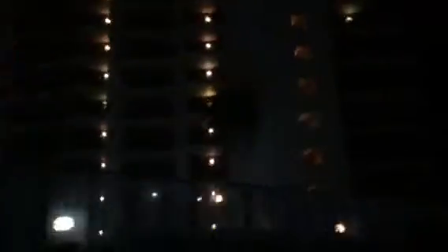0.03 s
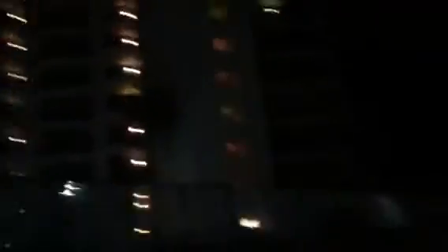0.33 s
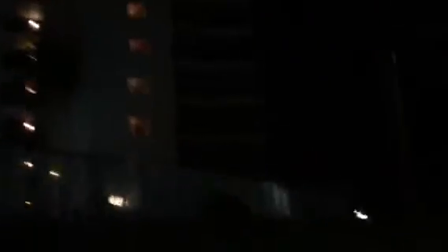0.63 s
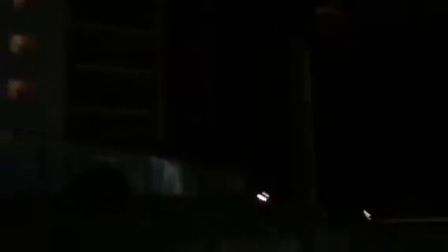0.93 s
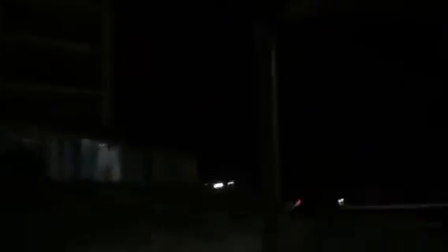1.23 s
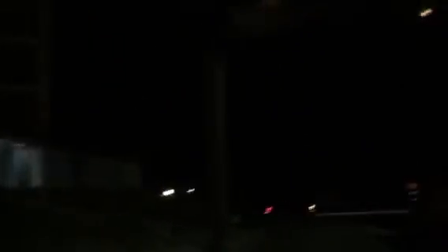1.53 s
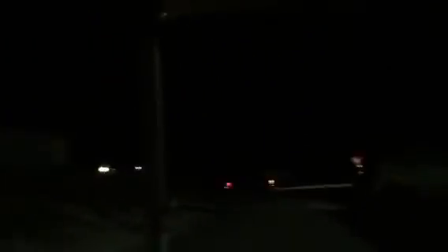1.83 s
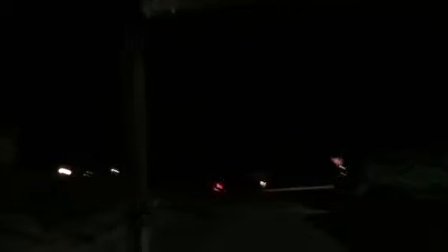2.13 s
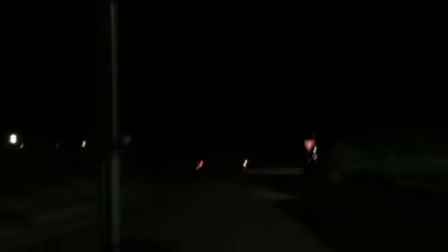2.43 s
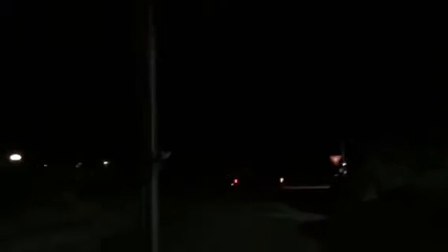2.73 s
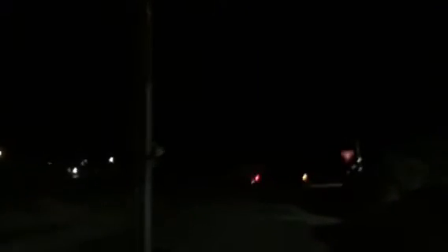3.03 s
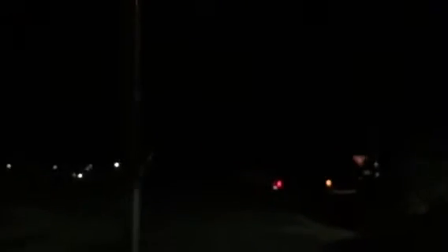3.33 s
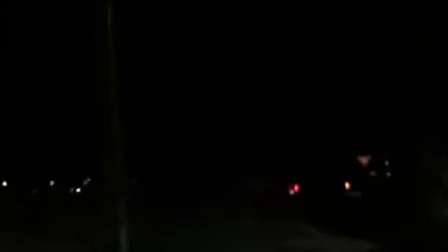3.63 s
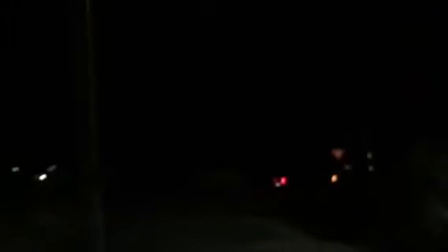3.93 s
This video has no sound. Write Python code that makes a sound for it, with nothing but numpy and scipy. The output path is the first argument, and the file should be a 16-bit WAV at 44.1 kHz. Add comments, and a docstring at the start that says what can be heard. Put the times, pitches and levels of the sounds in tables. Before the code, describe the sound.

Wind buffets a bare handheld microphone beside a road at night, making an uneven low rumble with thumps, flutters and small crackles. The gusts peak near the middle, while faint distant traffic murmurs behind and gradually recedes.

```python
"""A low, gusty rumble comes first: wind on a bare handheld microphone beside a road at night.
Turbulent air makes the pressure fluctuate, and the smaller the eddy, the higher its sound: big eddies
thump the diaphragm, while small ones flutter, rasp and crackle at the port and overload the input.
Distant traffic murmurs behind the wind, with a soft swell of tyre hiss."""
import sys
import numpy as np
from scipy import signal
from scipy.fft import rfft, irfft
from scipy.io import wavfile
from scipy.ndimage import uniform_filter1d, minimum_filter1d

SR = 44100
rng = np.random.default_rng(int(sys.argv[2]) if len(sys.argv) > 2 else 0)


def waveform_to_disk(signal):
    """Save audio, clipped to [-1, 1], as 16-bit WAV at the path in sys.argv[1]."""
    frames = np.transpose(np.atleast_2d(signal))
    scaled = np.clip(frames, -1, 1) * 32767
    samples = np.round(scaled).astype(np.int16)
    wavfile.write(sys.argv[1], SR, samples)


N = 176400
T = np.arange(N) / SR

# Strength of the airflow, as the relative level of its rumble: time_s, level_db
AIRFLOW = [(0,-25.5),(.05,-44),(.08,-19),(.27,-27),(.42,-18.5),(.52,-27.5),(.59,-27),(.66,-21.5),(.81,-18),(.86,-36.5),(.93,-15.5),(.99,-33.5),(1.13,-33.5),(1.18,-24),(1.27,-18),(1.31,-34),(1.36,-16.5),(1.43,-28),(1.51,-5.5),(1.63,-26.5),(1.68,-17),(1.89,-27.5),(2.07,-13.5),(2.2,-18.5),(2.31,-29.5),(2.37,-19.5),(2.58,-17.5),(2.63,-30),(2.7,-18),(2.87,-25.5),(2.96,-20.5),(3.08,-24),(3.16,-13.5),(3.22,-15),(3.26,-36),(3.32,-45),(3.39,-18.5),(3.52,-21),(3.66,-19.5),(4,-21)]
# Spectra of the wind rumble and of the weak eddies: frequency_hz, relative_density_db
RUMBLE_SPECTRUM = [(18,-33.5),(30,-29.5),(48,-5.5),(70,0),(120,-5),(220,-13.5),(330,-18),(600,-43),(1500,-77),(5000,-93)]
EDDY_SPECTRUM = [(100,-25),(230,2),(450,4.5),(900,-1.5),(1500,-7),(2500,-19.5),(4000,-34.5),(8000,-48)]
# Spectra of the traffic murmur and of the tyre hiss: frequency_hz, relative_density_db
TRAFFIC_SPECTRUM = [(25,-20.5),(65,20.5),(130,2),(300,-3),(600,-7.5),(950,-3),(1400,-6.5),(1950,-9.5),(2400,-26),(3500,-36.5),(5000,-46.5),(12000,-63.5)]
TYRE_SPECTRUM = [(1000,-22),(2500,16),(4000,6.5),(4900,-1),(6500,3),(7500,-3.5),(9400,-2),(10500,-15.5),(12000,-9.5),(15000,-16)]
# Narrow bands that sing in the traffic: pitch_hz, width_hz, relative_level_db
TRAFFIC_DRONES = [(668,18,-45),(955,14,-42.5),(1854,90,-44.5)]
# The murmur swells slightly, then recedes: time_s, gain_db
TRAFFIC_GAIN = [(0,-2),(1.2,-0.5),(2.4,-2.5),(4,-11.5)]
# Swell of the far tyre hiss: time_s, level_db
TYRE_SWELL = [(0,-59.5),(.5,-57.5),(1.0,-54.5),(1.4,-53.5),(2.0,-58),(2.6,-58),(3.3,-59),(4,-64)]
# Small eddies that break at the port: time_s, base_length_s, flutter_db, rasp_db, crackle_db
PORT_BUFFETS = [(0.073, 0.0018, -16.5, -41, -50), (0.087, 0.011, -14.5, -22.5, -40),
                (0.104, 0.0052, -18, -30, -56), (0.142, 0.0095, -21.5, -28.5, -49),
                (0.181, 0.01, -18, -24.5, -40.5), (0.211, 0.0037, -15, -21.5, -48),
                (0.217, 0.0037, -9, -12, -17), (0.255, 0.0087, -19, -38, -50),
                (0.307, 0.016, -21, -25.5, -39.5), (0.359, 0.0089, -17.5, -41, -57),
                (0.379, 0.0089, -17.5, -37, -52), (0.404, 0.0052, -21, -28, -40.5),
                (0.44, 0.014, -26, -27, -40), (0.444, 0.0052, -11, -14, -20.5),
                (0.505, 0.0063, -12.5, -18.5, -33), (0.518, 0.014, -19, -32, -51),
                (0.548, 0.0034, -16.5, -31, -40), (0.597, 0.0063, -21, -38, -59),
                (0.636, 0.012, -27, -29, -50), (0.65, 0.0055, -20, -22.5, -39),
                (0.664, 0.012, -21.5, -33, -54), (0.698, 0.002, -13, -34, -47),
                (0.715, 0.013, -16.5, -28, -43.5), (0.737, 0.014, -23.5, -31, -51),
                (0.809, 0.0034, -18.5, -49, -64), (0.857, 0.0034, -17, -25.5, -56),
                (0.921, 0.0049, -20, -36, -60), (0.95, 0.0056, -19, -31.5, -58),
                (1.168, 0.006, -24.5, -30.5, -60), (1.209, 0.0078, -16, -33, -57),
                (1.236, 0.0063, -13.5, -22, -43), (1.241, 0.0047, -7.5, -18.5, -35),
                (1.262, 0.0067, -13, -33, -54), (1.358, 0.0042, -11.5, -15, -33),
                (1.367, 0.0071, -14.5, -34, -49), (1.377, 0.0019, -4, -12.5, -22.5),
                (1.461, 0.0029, -35, -31, -61), (1.479, 0.0045, -12, -37, -58),
                (1.493, 0.0019, -8, -22, -28), (1.51, 0.0049, -22, -27, -58),
                (1.536, 0.0027, -6, -15.5, -30.5), (1.553, 0.00082, -19, -18, -39.5),
                (1.582, 0.0038, -9, -18, -34.5), (1.608, 0.004, -21, -32, -53),
                (1.654, 0.0025, -4.5, -16, -30), (1.668, 0.0092, -25, -25, -37.5),
                (1.68, 0.0019, -20, -21.5, -33.5), (1.694, 0.0073, -15, -26.5, -50),
                (1.707, 0.0022, -8, -22, -23), (1.734, 0.015, -21.5, -27.5, -45),
                (1.779, 0.0056, -18.5, -33, -49), (1.815, 0.0037, -12.5, -22, -36),
                (1.823, 0.0039, -19.5, -24, -62), (1.846, 0.0029, -9, -20, -31),
                (1.902, 0.0078, -20.5, -24, -39), (1.946, 0.0057, -14, -26.5, -45),
                (1.997, 0.0015, -8.5, -20, -31), (2.008, 0.0063, -9, -20, -32),
                (2.029, 0.0065, -13, -24, -36.5), (2.072, 0.0015, -15, -24, -26),
                (2.078, 0.0042, -2, -16, -33), (2.089, 0.0029, -7, -36, -28),
                (2.094, 0.0017, -11, -8, -16.5), (2.115, 0.015, -19, -28.5, -38),
                (2.175, 0.0042, -14.5, -22.5, -39), (2.199, 0.0041, -16.5, -17.5, -32),
                (2.25, 0.0018, -13, -34, -32), (2.269, 0.0054, -14.5, -26, -40.5),
                (2.278, 0.0062, -17.5, -27.5, -54), (2.301, 0.007, -19, -32, -68),
                (2.339, 0.0022, -8, -15, -26.5), (2.388, 0.009, -20, -41, -48),
                (2.415, 0.0066, -16.5, -22.5, -34.5), (2.431, 0.0011, -24, -24, -31.5),
                (2.447, 0.018, -23, -28, -54), (2.473, 0.0095, -26.5, -34, -49),
                (2.576, 0.0065, -18, -36.5, -46), (2.592, 0.0015, -16, -28.5, -58),
                (2.665, 0.0046, -14, -28, -37), (2.685, 0.0085, -15, -27, -35.5),
                (2.715, 0.004, -13, -21.5, -33), (2.734, 0.0061, -19.5, -16.5, -30.5),
                (2.744, 0.003, -36, -40, -35), (2.793, 0.0069, -13.5, -29, -42),
                (2.827, 0.0038, -19, -51, -66), (2.919, 0.0027, -10.5, -33, -32),
                (2.989, 0.0054, -14.5, -30, -37), (3.012, 0.0028, -18, -33, -49),
                (3.105, 0.0041, -17, -33, -45), (3.119, 0.0029, -10.5, -23, -41),
                (3.145, 0.0064, -13, -25, -39), (3.154, 0.004, -12, -32, -48),
                (3.211, 0.0035, -14, -25.5, -40), (3.337, 0.0023, -11, -27, -43),
                (3.347, 0.0044, -16.5, -23, -40.5), (3.391, 0.0079, -17, -25, -38.5),
                (3.403, 0.0046, -14.5, -26, -45), (3.425, 0.0055, -17.5, -29, -40),
                (3.449, 0.0026, -18.5, -21.5, -35.5), (3.548, 0.0017, -32, -26.5, -54),
                (3.584, 0.0036, -14.5, -35, -45), (3.634, 0.0031, -16.5, -19, -42),
                (3.643, 0.0044, -17, -26, -41.5), (3.686, 0.0064, -33, -30, -50),
                (3.725, 0.0036, -19.5, -30, -48), (3.77, 0.0026, -20.5, -29, -46),
                (3.829, 0.0026, -17.5, -23.5, -41), (3.909, 0.011, -19.5, -29.5, -53)]
# Spectra of the low, middle and high parts of a buffet: frequency_hz, relative_density_db
FLUTTER_SPECTRUM = [(100,-7.5),(220,8.5),(330,8.5),(470,-0.5),(650,1),(950,0),(1400,-10),(2200,-27.5),(5000,-65)]
RASP_SPECTRUM = [(400,-58),(1000,-0.5),(1500,3.5),(2200,-2),(3200,-10.5),(4500,-39.5),(9000,-46)]
CRACKLE_SPECTRUM = [(1200,-31),(2800,3),(3900,3.5),(5000,-5.5),(6500,-11.5),(9000,-20.5),(10500,-29),(15000,-38.5)]
# The fastest jets across the port: time_s, length_s, level_db
PORT_JETS = [(0.218, .002, -39), (0.441, 0.0068, -42), (2.745, 0.007, -49)]
# Spectrum of their sizzle: frequency_hz, relative_density_db
SIZZLE_SPECTRUM = [(3500,-19),(6500,0),(15000,-6)]
# Big eddies that swing the diaphragm: time_s, centre_pitch_hz, relative_level_db
BIG_EDDIES = [(0.221, 127, -12.5), (0.407, 91.8, -15), (0.45, 123.3, -14), (0.516, 140.6, -13),
              (0.801, 133.7, -12.5), (0.922, 141, -13), (1.175, 89.3, -16), (1.245, 175, -16.5),
              (1.354, 151.3, -7.5), (1.398, 106.2, -10), (1.479, 170.7, -6.5), (1.498, 115.2, -2.5),
              (1.539, 171.2, -5.5), (1.588, 116, -3.5), (1.664, 166.8, -5.5), (1.703, 219.6, -3),
              (1.733, 187.7, -12.5), (1.793, 173.2, -9), (1.826, 185, -8), (1.846, 197, -10),
              (1.898, 189.2, -12.5), (2.002, 128.1, -2.5), (2.055, 129.6, -12), (2.083, 151, -4),
              (2.101, 87.8, -13.5), (2.143, 134.4, -27), (2.251, 155.4, -14), (2.304, 189.2, -12.5),
              (2.344, 139.2, -6.5), (2.394, 109.4, -13.5), (2.42, 198.6, -11.5), (2.439, 121, -14),
              (2.685, 135.8, -14.5), (2.793, 172.4, -5.5), (2.928, 120.6, -10.5), (2.991, 107.7, -17),
              (3.012, 171, -11), (3.117, 168.7, -7), (3.156, 146.7, -4.5), (3.39, 123, -13.5),
              (3.428, 169.7, -5.5), (3.466, 82, -12.5), (3.642, 125.4, -7), (3.69, 114.1, -9),
              (3.742, 97, -10.5), (3.826, 179, -13.5), (3.871, 135, -14)]
# Spectrum of the airy hiss: frequency_hz, relative_density_db
AIR_SPECTRUM = [(1500,1.5),(3500,8),(5500,-6),(8000,-9),(11000,-12),(15000,-17)]


def undb(db):
    """Amplitude ratio: a factor of ten for every 20 dB."""
    return 10 ** (np.asarray(db) / 20)


def curve(rows):
    """Linear interpolation through (time_s, value) rows."""
    return np.interp(T, *np.array(rows).T)


def noise(spectrum):
    """Spectral shaping: white noise weighted by a spectrum and scaled to unit rms."""
    hz, db = np.array(spectrum).T
    bins_hz = np.maximum(np.arange(N // 2 + 1) * SR / N, 1)
    gain = undb(np.interp(np.log(bins_hz), np.log(hz), db))
    shaped = irfft(rfft(rng.standard_normal(N)) * gain, N)
    return shaped / shaped.std()


def waver(rate_hz):
    """Low-pass noise: a smooth fluctuation of unit rms, mostly slower than rate_hz."""
    bins_hz = np.arange(N // 2 + 1) * SR / N
    smooth = irfft(rfft(rng.standard_normal(N)) * np.exp(-2 * (bins_hz / rate_hz) ** 2), N)
    return smooth / smooth.std()


def around(time_s, reach_s=.05):
    """Time window: the sample indices on both sides of a transient."""
    return np.arange(max(int((time_s - reach_s) * SR), 0), min(int((time_s + reach_s) * SR), N))


def bell(t, length_s):
    """Gaussian envelope whose full width at half power is length_s."""
    return 2 ** (-2 * (t / length_s) ** 2)


def rumble(flow_db):
    """Turbulent pressure fluctuation: slow swings that grow with the airflow."""
    pressure = noise(RUMBLE_SPECTRUM)
    local_power = uniform_filter1d(pressure ** 2, size=1500)
    evened = pressure / np.sqrt(local_power + 0.023)
    offset_db, waver_db = 1.96, 3
    return evened * undb(flow_db + offset_db + waver_db * waver(rate_hz=23))


def small_eddies(flow_db):
    """Intermittency: weak eddies sputter at random, more strongly in a fast flow."""
    typical_flow_db, typical_level_db, scatter_db = -14, -32, 8
    puffs = 2 * np.tanh(waver(rate_hz=206) / 2)
    level_db = typical_level_db + 0.52 * (flow_db - typical_flow_db) + scatter_db * puffs
    return noise(EDDY_SPECTRUM) * undb(level_db)


def drone(pitch_hz, width_hz):
    """Narrow-band noise: random quadrature amplitudes make a tone waver in level and phase."""
    phase = 2 * np.pi * pitch_hz * T
    return (waver(width_hz) * np.cos(phase) + waver(width_hz) * np.sin(phase)) / np.sqrt(2)


def traffic():
    """Incoherent addition: far vehicles merge into a murmur with singing bands and tyre hiss."""
    murmur = noise(TRAFFIC_SPECTRUM) * undb(-36)
    drones = sum(undb(db) * drone(hz, width_hz) for hz, width_hz, db in TRAFFIC_DRONES)
    tyres = noise(TYRE_SPECTRUM) * undb(curve(TYRE_SWELL))
    return (murmur + drones) * undb(curve(TRAFFIC_GAIN)) + tyres


def bursts(spectrum, levels_db, stretch, skirt_gain):
    """Amplitude modulation: each buffet shapes grainy noise into a core on a weaker, wider skirt."""
    grain_db, lean, skirt_stretch = 6.5, .15, 3.14
    out = np.zeros(N)
    grains = noise(spectrum) * undb(grain_db * waver(rate_hz=530))
    for (time_s, length_s, *_), db in zip(PORT_BUFFETS, levels_db):
        span = around(time_s)
        t = T[span] - time_s
        skewed = t * np.exp(lean * np.sign(t))  # builds more slowly than it breaks off
        core_s = length_s * stretch
        envelope = bell(skewed, core_s) + skirt_gain * bell(skewed, core_s * skirt_stretch)
        burst = grains[span] * envelope
        # the energy equals that of a steady level db lasting length_s
        out[span] += undb(db) * burst * np.sqrt(length_s * SR / np.sum(burst ** 2))
    return out


def buffets():
    """Eddy breakdown at the port: a flutter, a shorter rasp and a crackle at the fastest instant."""
    _, _, flutter_db, rasp_db, crackle_db = np.array(PORT_BUFFETS).T
    flutter = bursts(FLUTTER_SPECTRUM, flutter_db, stretch=1, skirt_gain=0.12)
    rasp = bursts(RASP_SPECTRUM, rasp_db, stretch=0.62, skirt_gain=0.093)
    crackle = bursts(CRACKLE_SPECTRUM, crackle_db, stretch=0.42, skirt_gain=0.12)
    return flutter + rasp + crackle


def sizzles():
    """Jet noise: the fastest air across the port adds a thin, bright hiss."""
    envelope = sum(undb(db) * bell(T - time_s, length_s) for time_s, length_s, db in PORT_JETS)
    return noise(SIZZLE_SPECTRUM) * envelope


def thumps():
    """Forced vibration: a big eddy drives the diaphragm for a cycle or two, slowing as it leaves."""
    offset_db, length_cycles, sag_per_s, wobble_rad = 1.2, 0.92, 14.08, 0.92
    out = np.zeros(N)
    wobble = wobble_rad * waver(rate_hz=240)
    for (time_s, pitch_hz, db), start_cycle in zip(BIG_EDDIES, rng.random(len(BIG_EDDIES))):
        span = around(time_s)
        t = T[span] - time_s
        cycles = np.cumsum(pitch_hz * np.exp(-sag_per_s * t)) / SR
        swing = np.sqrt(2) * np.sin(2 * np.pi * (cycles + start_cycle) + wobble[span])
        out[span] += undb(db + offset_db) * bell(t, length_cycles / pitch_hz) * swing
    return out


def airy_hiss():
    """Broadband noise under a Gaussian envelope: a soft hiss swells once and fades."""
    peak_s, peak_db = 1.25, -52.5
    return noise(AIR_SPECTRUM) * undb(peak_db) * bell(T - peak_s, length_s=0.28)


def scene():
    """Superposition: the pressures of wind and distant traffic add in one channel."""
    flow_db = curve(AIRFLOW)
    wind = rumble(flow_db) + thumps() + buffets() + sizzles() + small_eddies(flow_db)
    return (wind + traffic() + airy_hiss())[None]


def record(dry):
    """Band limiting and overload: the deepest bass is shed, peaks are held and rounded, the top is cut."""
    low_cut_hz, high_cut_hz = 35, 15200
    threshold, hold_s = .74, .004  # fast limiter
    ceiling, knee = .8, 8  # soft saturation of the input
    pressure = signal.sosfilt(signal.butter(4, low_cut_hz, "high", fs=SR, output="sos"), dry)
    hold = int(hold_s * SR)
    gain = minimum_filter1d(threshold / np.maximum(np.abs(pressure), threshold), size=hold)
    smooth_gain = uniform_filter1d(uniform_filter1d(gain, size=hold // 2), size=hold // 2)
    limited = pressure * smooth_gain
    rounded = limited / (1 + np.abs(limited / ceiling) ** knee) ** (1 / knee)
    return signal.sosfilt(signal.ellip(8, .2, 70, high_cut_hz, fs=SR, output="sos"), rounded)


dry = scene()
out = record(dry)
waveform_to_disk(out)
```